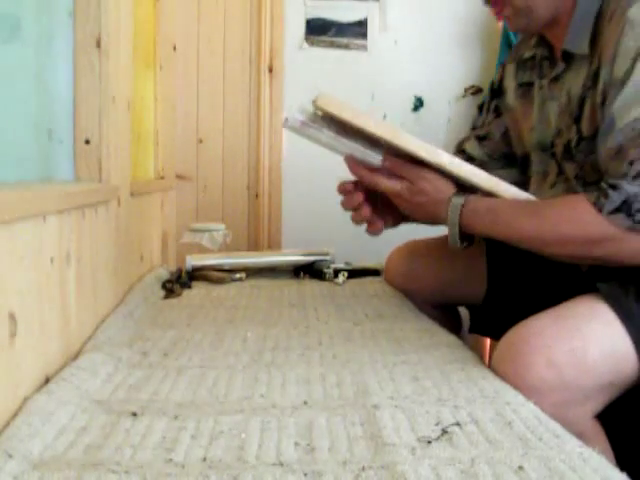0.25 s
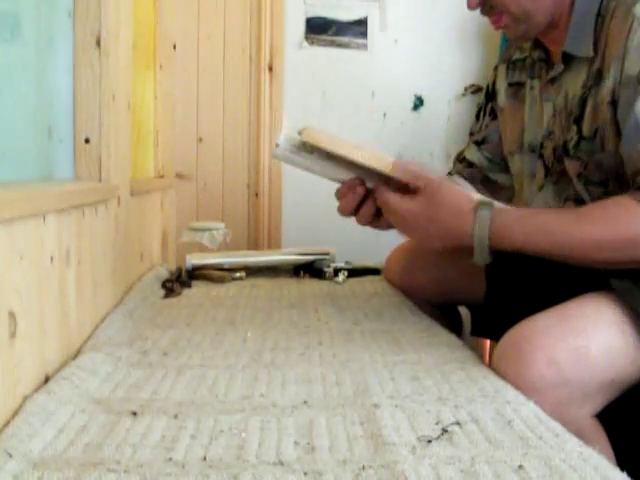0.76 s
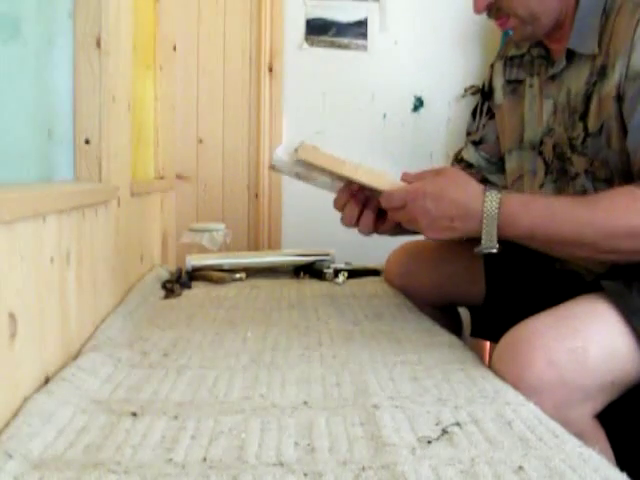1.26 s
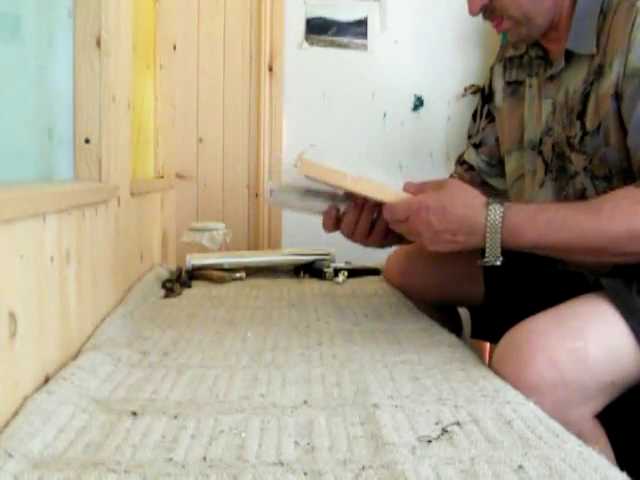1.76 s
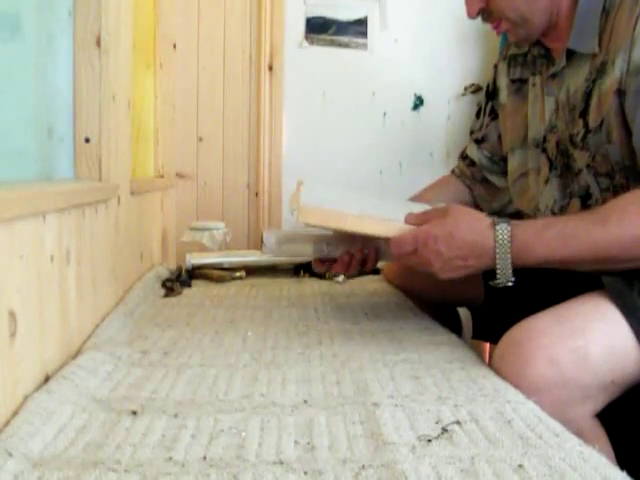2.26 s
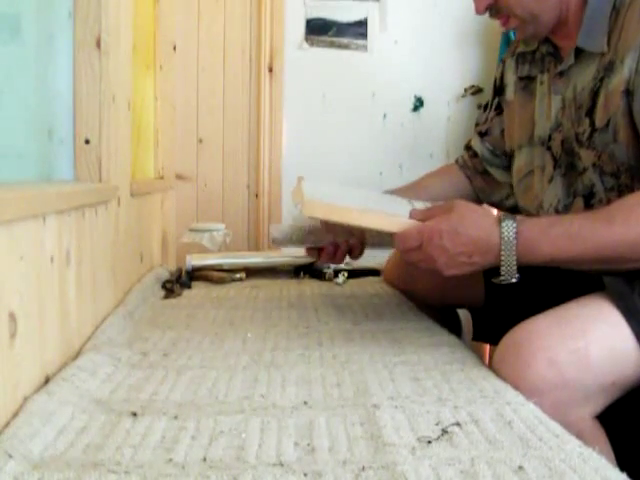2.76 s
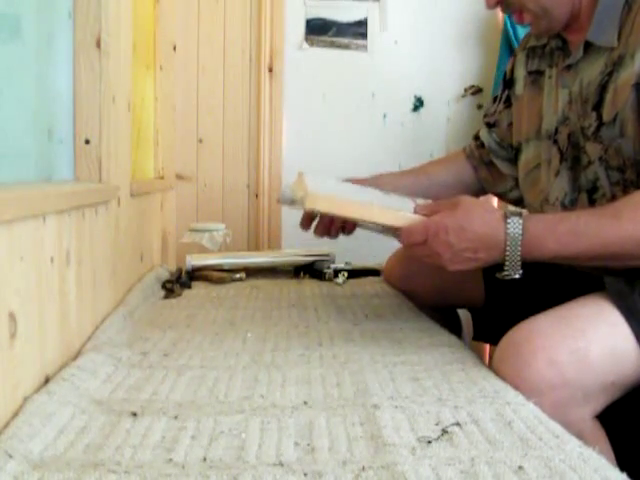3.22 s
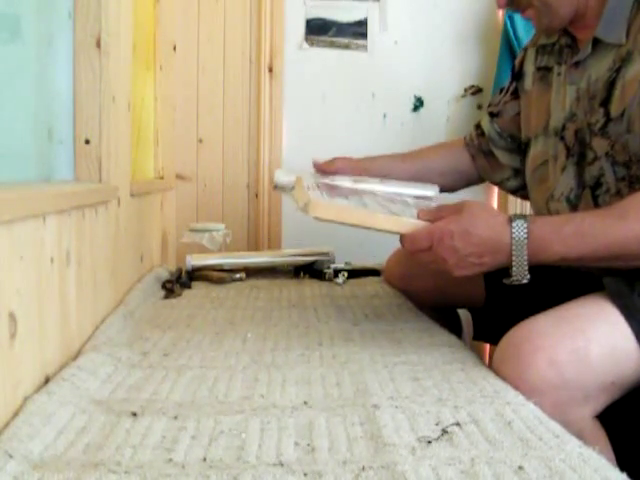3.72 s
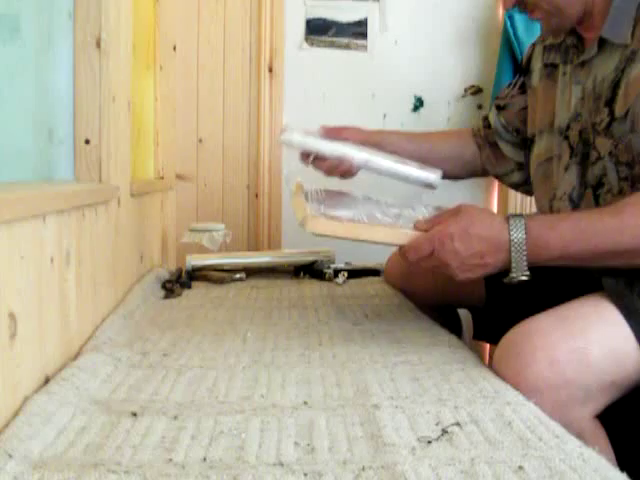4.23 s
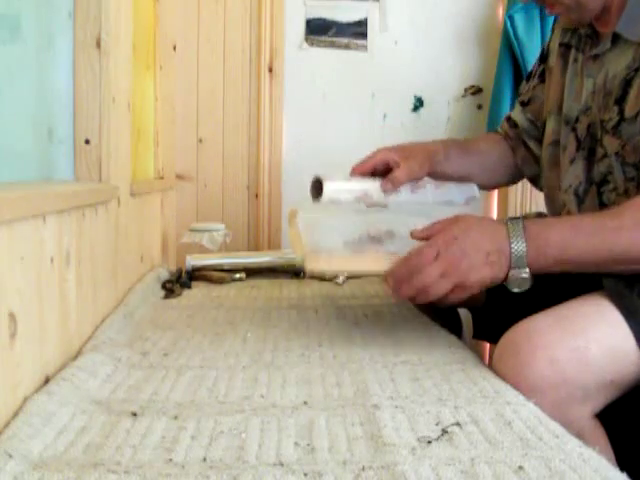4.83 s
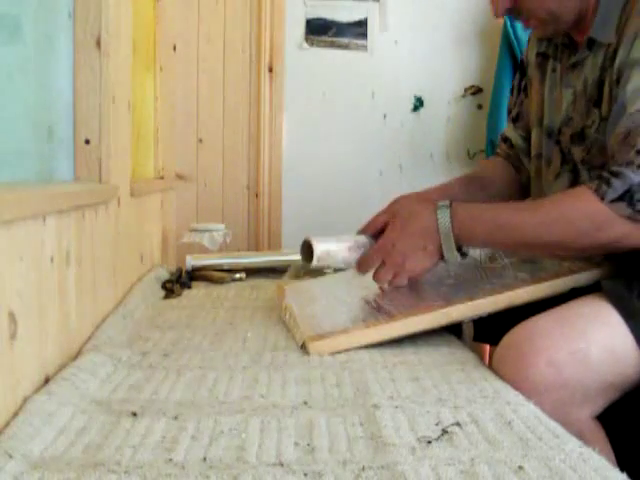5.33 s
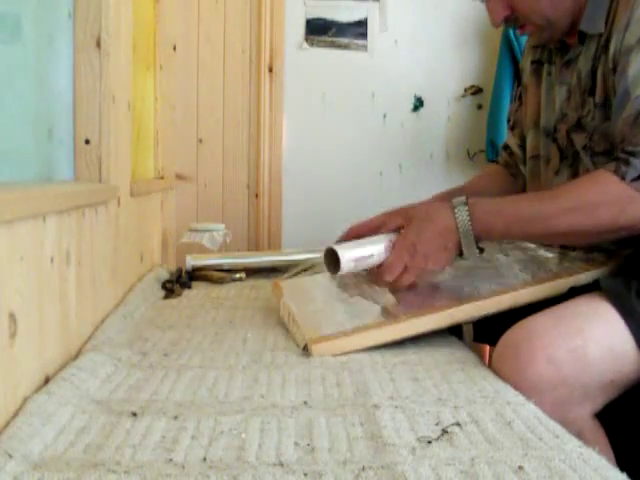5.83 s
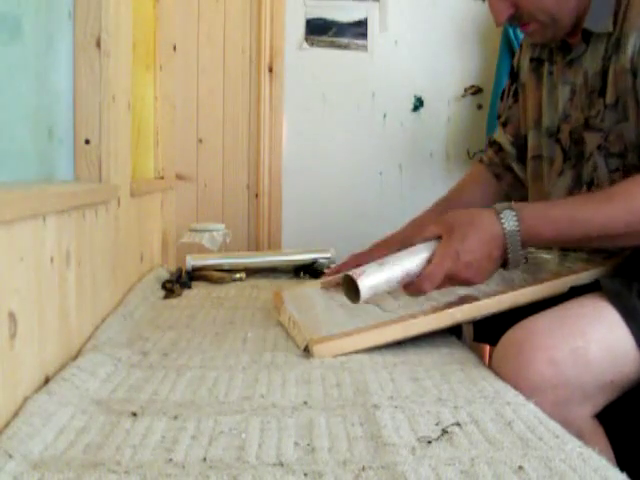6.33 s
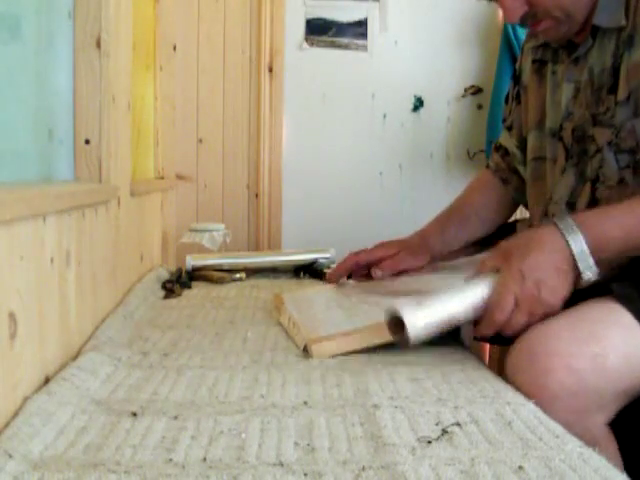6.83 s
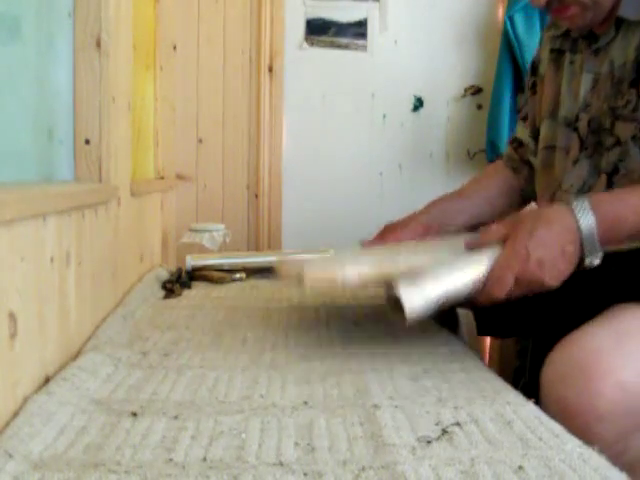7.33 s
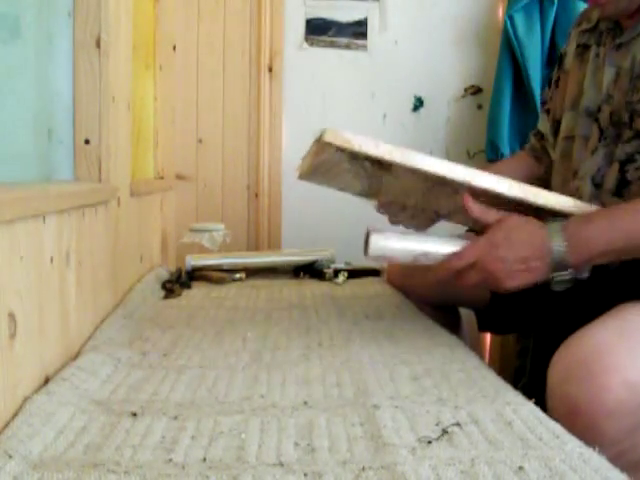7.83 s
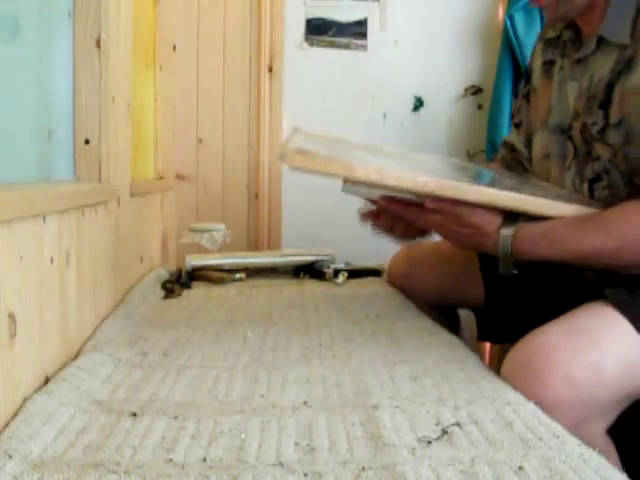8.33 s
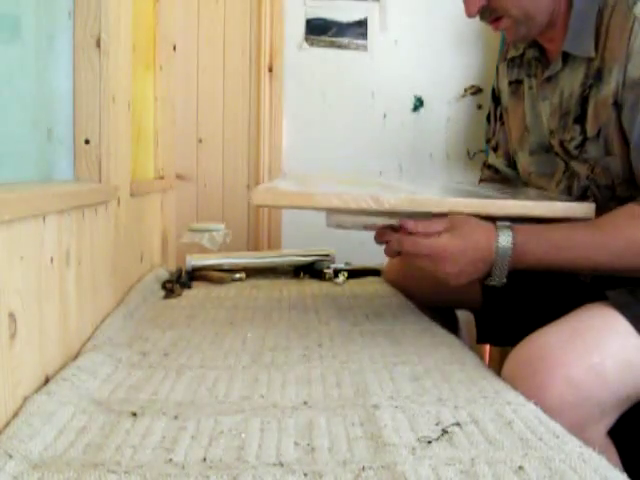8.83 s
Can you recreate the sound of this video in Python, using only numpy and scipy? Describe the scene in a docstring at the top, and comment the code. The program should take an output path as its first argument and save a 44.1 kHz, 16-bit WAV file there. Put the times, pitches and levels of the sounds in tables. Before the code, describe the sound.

A small wood-lined room with short, sparse echoes, faint low room tone and light hiss; the microphone is close and the loudest snaps clip slightly. From 0 to 1.7 s foil crinkles briskly, with sharp single snaps, dull wooden knocks near 0.65 and 1.25 s, and a strong snap at 1.63. From 1.8 to 3.6 s it is sparse: thin ticks, faint rustle, low handling bumps near 2.5 and 3.0. Rustle swells at 3.9 with a tiny high squeak at 4.0; dense bright crackles run 4.5 to 4.9. At 5.0 the board is set down with the heaviest low, soft thud and a crisp snap. Pressing and folding crackle in short bursts to 6.6, a short squeak at 6.76 leads into a loud crunch at 6.8. Snaps strike at 7.4 and 7.7, a dull knock at 8.15, and rustling with a woody rub around 8.7 fades towards 9 s.

```python
"""In a small wood-lined room, hands wrap aluminium foil round a wooden board near a microphone.
Creases snap singly as impulses and crackle in swarms of resonant clicks; fingers squeak as fuzzy tones.
Pats and set-downs ring the board's modes and push low swelling tones; rubbing, floor shake and hiss lie below.
Sparse echoes follow, a microphone port lifts 6 kHz between two notches, and the loudest snaps overload."""
import sys
import numpy as np
from scipy import signal
from scipy.fft import rfft, irfft
from scipy.io import wavfile
from scipy.ndimage import uniform_filter1d

SR = 44100
rng = np.random.default_rng(int(sys.argv[2]) if len(sys.argv) > 2 else 0)


def wav_record(signal):
    """Record a signal, one row per channel, as 16-bit PCM in the file named by sys.argv[1]."""
    frames = np.transpose(np.atleast_2d(signal))
    bounded = np.clip(frames, -1, 1)
    # unit amplitude maps onto the largest positive 16-bit level
    quanta = np.round(bounded * 32767).astype(np.int16)
    wavfile.write(sys.argv[1], SR, quanta)


N = 399987


def gain_of(db):
    """Decibel law: level to amplitude ratio; a doubled level gives the power ratio."""
    return 10 ** (np.asarray(db) / 20)


def evened(x):
    """Normalisation: the signal is scaled to an rms of 1."""
    return x / np.sqrt(np.mean(x ** 2) + 1e-20)


def read(points, hz):
    """Logarithmic frequency scale: a curve of (f, value) is interpolated along log f."""
    f, value = np.transpose(points)
    return np.interp(np.log(hz + 1), np.log(f + 1), value)


def follow(rows):
    """Slow modulation: each column after t is interpolated sample by sample."""
    s, *columns = np.transpose(rows)
    return [np.interp(np.arange(N) / SR, s, c) for c in columns]


def band(x, lo_hz, hi_hz):
    """Band limitation by a third-order Butterworth band-pass."""
    sos = signal.butter(3, [lo_hz, hi_hz], "bandpass", fs=SR, output="sos")
    return signal.sosfilt(sos, x)


def wander(corner_hz):
    """Random modulation: white noise through a one-pole low-pass, at rms 1."""
    pole = np.exp(-2 * np.pi * corner_hz / SR)
    return evened(signal.lfilter([1], [1, -pole], rng.standard_normal(N)))


def swell(s, hold_s, rise_s, fall_db_per_s):
    """Power envelope: amplitude rises linearly, holds, then decays exponentially."""
    t = np.arange(N) / SR - s
    rise = np.clip(t / rise_s, 0, 1) ** 2
    falling_s = np.clip(t - rise_s - hold_s, 0, 1)
    return rise * gain_of(-2 * fall_db_per_s * falling_s)


# spectrum of the room tone: (f/Hz, relative level/dB per Hz)
ROOM_TONE = [(15, -42), (25, -22), (130, 5), (210, -2), (292, 9.5), (554, -5), (909, -0.5), (1150, -11),
             (1290, -7), (2000, -11), (2600, -15), (4400, -120)]
ROOM_TONE_DB, HISS_DB = -53.5, -55


def air():
    """Stationary noise: shaped room tone and the band-limited hiss of the input."""
    hz = np.fft.rfftfreq(N, 1 / SR)
    spectrum = rfft(rng.standard_normal(N)) * gain_of(read(ROOM_TONE, hz))
    tone = evened(irfft(spectrum, N))
    hiss = band(rng.standard_normal(N), 1700, 22000)
    return gain_of(ROOM_TONE_DB) * tone + gain_of(HISS_DB) * hiss


# jolts of the floor: (t/s of the peak, relative peak level/dB)
FLOOR_JOLTS = [(0.01, -49), (0.66, -59), (1.26, -61), (2.53, -47), (2.63, -53), (3.74, -60), (4.97, -41),
               (5.15, -37.5), (5.86, -63), (6.82, -48), (6.97, -56), (7.17, -53), (7.85, -53), (8.39, -53)]
JOLT_RISE_S, JOLT_FALL_DB_PER_S, STILL_DB = 0.042, 88, -68


def shake():
    """Structure-borne vibration: low noise from the floor under the microphone swells at each jolt."""
    power = gain_of(2 * STILL_DB)
    for s, db in FLOOR_JOLTS:
        jolt = swell(s - JOLT_RISE_S, 0, JOLT_RISE_S, JOLT_FALL_DB_PER_S)
        power = power + gain_of(2 * db) * jolt
    return evened(band(rng.standard_normal(N), 21, 84)) * np.sqrt(power)


def ring(modes):
    """Modal superposition: an impulse response is a sum of exponentially decaying sines."""
    t = np.arange(SR // 3) / SR
    return sum(gain_of(db - 60 * t / t60) * np.sin(2 * np.pi * hz * t) for hz, db, t60 in modes)


# bending modes of the board: (f/Hz, relative level/dB, 60 dB decay time/s)
BOARD_MODES = [(259, -30, 0.14), (299, -3, 0.084), (376.7, 1, 0.06), (458.6, 1.5, 0.061),
               (521, -1.5, 0.067), (596, 4, 0.026), (730, -2.5, 0.032), (989, -15, 0.1), (1288, 1, 0.036),
               (1448, -0.5, 0.049), (1563, -4, 0.051)]
# moving hands: (t/s, foil rustle level/dB, board level/dB, low push level/dB), all relative
HAND_MOTION = [(0.0, -30, -40.5, -55), (0.56, -42.5, -38, -50), (0.78, -29, -49, -49),
               (0.85, -43, -52, -58), (1.0, -30.5, -39.5, -52), (1.49, -35.5, -42.5, -53),
               (1.77, -40.5, -62, -66), (1.88, -42.5, -63, -69), (2.32, -42.5, -71, -67),
               (2.73, -41.5, -54, -47), (3.38, -46.5, -46, -61), (3.89, -27.5, -35, -55),
               (3.95, -41, -43, -57), (4.1, -31, -51, -54), (4.16, -48.5, -60, -60), (4.29, -31, -54, -56),
               (4.5, -38, -45, -60), (4.7, -37.5, -39.5, -63), (4.97, -24, -38.5, -44),
               (6.06, -40, -46, -56), (6.27, -37.5, -42.5, -47.5), (7.8, -32, -41.5, -47),
               (8.1, -31, -45, -55), (8.28, -40, -55, -57), (8.69, -24, -35, -58), (9.07, -44.5, -53, -60)]


def handling():
    """Forced vibration: uneven rubbing noise excites the board, over a dull low push."""
    _, board_db, push_db = follow(HAND_MOTION)
    rub, push = rng.standard_normal((2, N)) * gain_of(1.6 * wander(25))
    ringing = signal.oaconvolve(rub, ring(BOARD_MODES[:7]))[:N]
    board = evened(ringing + 20 * band(rub, 170, 830))
    low = evened(band(push, 70, 158))
    return gain_of(board_db - 12) * board + gain_of(push_db - 5.5) * low


# palm and sheet push air: (t/s, relative level/dB, nominal f/Hz, time scale/cycles)
AIR_PUSHES = [(0.056, -22, 134, 3.5), (0.242, -32, 155, 3.7), (0.649, -17, 139, 7.4),
              (0.762, -24, 142, 3.3), (0.915, -26, 150, 3.7), (1.063, -33.5, 134, 4.7),
              (1.261, -16, 149, 4.5), (1.369, -32, 137, 3.7), (1.428, -25, 133, 4.3),
              (1.555, -26.5, 138, 4.3), (2.533, -23, 163, 3), (2.607, -23.5, 157, 4.8),
              (2.685, -21, 155, 3.7), (2.965, -20, 165, 3.4), (3.679, -36, 156, 3.4),
              (3.744, -26, 125, 2.3), (3.789, -36, 157, 4), (4.356, -33, 151, 7.4), (4.601, -33, 152, 4),
              (4.977, -5, 133, 5.2), (5.009, -9.5, 109, 3.4), (5.074, -32, 86.1, 3.8),
              (5.115, -21.5, 147, 4.2), (5.813, -28.5, 133, 5.3), (6.092, -38, 99, 4.6),
              (6.362, -33, 136, 5.3), (6.409, -26, 117, 8.2), (6.498, -31, 130, 3.2),
              (6.806, -19, 131, 5.6), (6.998, -37, 119, 5.4), (7.203, -27, 115, 4.3),
              (7.236, -26.5, 143, 7.4), (7.37, -28, 137, 6.9), (7.423, -27, 105, 7), (7.708, -25, 153, 9.3),
              (7.733, -20, 144, 12.4), (7.836, -24.5, 139, 7.6), (8.451, -30.5, 145, 4.9)]


def thumps(sag=0.15):
    """Displacement of air: a low tone swells and dies within cycles while its pitch sags."""
    out, t = np.zeros(N + SR), np.arange(SR // 4) / SR
    for s, db, hz, cycles in AIR_PUSHES:
        u = t * hz / cycles
        pitch_hz = hz * (1 + sag * (.4 - np.minimum(u, 2)))
        turns = np.cumsum(pitch_hz) / SR
        envelope = (3 * u * np.exp(1 - 3 * u)) ** 2
        out[round(s * SR):][:len(u)] += gain_of(db - 6) * envelope * np.sin(2 * np.pi * turns)
    return out[:N]


# hands and floor strike the board; middle and upper modes are given relative to the blow:
# (t/s, relative level/dB, middle modes level/dB, upper modes level/dB)
BLOWS = [(0.076, -16, -16, -28), (0.358, -27, -20, -10), (0.647, -7.5, -8, -10.5), (0.748, -23.5, -7, -8),
         (0.926, -28.5, -14, -16), (1.255, -9, -3.5, -4), (1.326, -37, -13, -22), (1.427, -21, -29, -25),
         (1.553, -20.5, -5.5, -18), (2.529, -29.5, -7.5, -7), (2.609, -33.5, -12, -16),
         (2.683, -33.5, -3.5, -8), (2.963, -23.5, -14.5, -10), (3.657, -35.5, 3.5, -1), (3.759, -29, 1, -4),
         (3.993, -39.5, 3.5, 8.5), (4.347, -46, 17, -5), (4.719, -44.5, 13.5, -3), (4.957, -20, -15, -12),
         (5.03, -31.5, 0, 1), (5.245, -44.5, 6.5, 13), (5.475, -22, -9, -22), (5.712, -45, 8.5, 12.5),
         (6.026, -42.5, 9.5, 20), (6.357, -33, -3.5, -2), (6.67, -31, -22, -20), (6.804, -22, -5.5, -12.5),
         (6.969, -47.5, 6.5, 16.5), (7.232, -31.5, -0.5, -4), (7.42, -29.5, 6, 8), (7.713, -20, -6, -19),
         (8.159, -15.5, -21, -20), (8.451, -33, 0, -11), (8.616, -40.5, 6.5, -13), (8.883, -22.5, 4.5, 7.5)]
FINGERS_MS = 8  # the fingers of one blow land within this time


def knocks():
    """Impulse excitation: fingers land in turn and ring the modes, with a set spectral reach per blow."""
    out = np.zeros(N + SR)
    chance = rng.random((len(BLOWS), 4))
    for (s, db, middle_db, upper_db), fingers in zip(BLOWS, chance):
        push = np.zeros(2048)
        push[(fingers * FINGERS_MS * SR / 1000).astype(int)] = 0.71
        push[0] = 1
        reach = [(360, 0), (470, middle_db), (800, middle_db), (1250, upper_db)]  # (f/Hz, level/dB)
        modes = [(hz, mode_db + read(reach, hz), t60) for hz, mode_db, t60 in BOARD_MODES]
        sound = signal.fftconvolve(ring(modes), push) / np.linalg.norm(push)
        out[round(s * SR):][:len(sound)] += gain_of(db - 7) * sound
    return out[:N]


# fingers slip on smooth foil, one list a squeak, overtone relative to the tone:
# (t/s, f/Hz, relative level/dB, overtone level/dB before a fixed lift)
FINGER_SQUEAKS = [
    [(4.014, 8220, -26, -40), (4.02, 8030, -19, -40), (4.024, 9500, -26, -40), (4.034, 9900, -15, -40),
     (4.045, 9560, -30, -40), (4.06, 9600, -34, -40)],
    [(6.752, 5070, -35, -5), (6.758, 5090, -21, -7), (6.764, 5290, -25, -8), (6.77, 5550, -38, -10)],
]


def squeaks():
    """Stick-slip friction: a tone and its octave, fuzzy through random frequency and amplitude."""
    out = np.zeros(N)
    for rows in FINGER_SQUEAKS:
        s, *columns = np.transpose(rows)
        t = np.arange(s[0], s[-1], 1 / SR)
        hz, db, over_db = (np.interp(t, s, c) for c in columns)
        jitter, flutter = uniform_filter1d(rng.standard_normal((2, len(t))), 30, axis=1)
        phase = 2 * np.pi * np.cumsum(hz * (1 + 0.11 * jitter)) / SR
        tone = np.sin(phase) + gain_of(over_db + 7) * np.sin(2 * phase)
        tone *= 1 + 1.8 * flutter
        fade = signal.windows.tukey(len(t), .2)
        out[round(s[0] * SR):][:len(t)] += gain_of(db + 13.5) * tone * fade
    return out


def foil(wide, middle, fine):
    """Size and pitch: wide folds sound low, small creases high."""
    return band(wide, 553, 3820) + band(middle, 4890, 7480) + band(fine, 8550, 16600)


# the sheet is bent and creases crackle; wide folds and fine creases relative to the swarm:
# (onset t/s, time to the fall/s, relative level/dB, wide folds level/dB, fine creases level/dB)
CREASE_SWARMS = [(0.007, 0.074, -26, -1.5, -7), (0.22, 0.074, -35, -5, -18), (0.33, 0.032, -32, -2, -8),
                 (0.374, 0.03, -26, -5, -8), (0.422, 0.064, -23.5, -3, -14),
                 (0.522, 0.028, -24.5, -3.5, -13), (0.64, 0.028, -23.5, -1.5, -14),
                 (1.042, 0.094, -17, -3, -7.5), (1.216, 0.057, -26, 2.5, -16),
                 (1.43, 0.097, -28.5, -5.5, -9.5), (1.525, 0.034, -34, -5, -14),
                 (1.641, 0.069, -24.5, -6, -14), (1.812, 0.027, -55, -5, -11), (1.938, 0.052, -39, -12, -7),
                 (2.04, 0.032, -31.5, -6.5, -11), (2.476, 0.082, -31, -6, -6), (2.65, 0.019, -42, 7, -18),
                 (2.96, 0.031, -32, 1, -9), (3.382, 0.03, -35.5, -4.5, -6), (3.5, 0.07, -45, -5, -9),
                 (3.73, 0.062, -23, -2.5, -11), (3.984, 0.097, -27.5, -9.5, -4.5),
                 (4.35, 0.025, -31, -1, -20), (4.42, 0.036, -42, 3, -17), (4.521, 0.074, -23.5, -7, -13),
                 (4.646, 0.042, -18, -8, -12), (4.702, 0.019, -20.5, -2.5, -10),
                 (4.764, 0.025, -19, -17, -13), (4.85, 0.029, -24, -34, -15), (5.003, 0.016, -24, -7, -15),
                 (5.096, 0.023, -42, -12, 0), (5.167, 0.045, -31, -3, -14), (5.24, 0.055, -31, -2, -7),
                 (5.423, 0.026, -15, -7, -9), (5.485, 0.098, -22, -1, -14), (5.625, 0.112, -27, -5.5, -7),
                 (5.794, 0.059, -33, -6, -7), (6.009, 0.033, -19, -6, -11), (6.121, 0.092, -25, -4, -7),
                 (6.356, 0.022, -30.5, 4.5, -9), (6.43, 0.045, -27.5, -7.5, -4.5),
                 (6.542, 0.093, -29.5, -4, -7.5), (6.71, 0.02, -21, -10, -20), (6.752, 0.03, -16, -26, -17),
                 (6.806, 0.092, -13.5, -5, -10.5), (7.175, 0.19, -28, -3, -8.5),
                 (7.402, 0.016, -12, -1, -16), (7.57, 0.055, -32, -20, -3),
                 (7.708, 0.046, -15.5, -0.5, -17), (8.112, 0.029, -22.5, -7, -6),
                 (8.162, 0.022, -31, -16, -19), (8.322, 0.056, -34, -23, -7),
                 (8.435, 0.041, -24.5, -5.5, -9), (8.546, 0.024, -29, -1.5, -10),
                 (8.616, 0.038, -19.5, -3.5, -21.5), (8.819, 0.071, -27.5, -5, -9.5)]
SWARM_RISE_S, SWARM_FALL_DB_PER_S = .012, 303
RUSTLE_WIDE_DB, RUSTLE_FINE_DB = -6, -8  # colour of the rustle between swarms


def crackle(per_s=600, spread_db=1.5, clump_db=2.5, patch_db=1.0, rustle=0.72, sharp=2.57):
    """Random impulses through resonators: clumped clicks ring at many pitches over a noisy rustle."""
    rustle_db = follow(HAND_MOTION)[0]
    power = gain_of(2 * (rustle_db + np.array([[RUSTLE_WIDE_DB], [0], [RUSTLE_FINE_DB]])))
    for s, hold_s, db, wide_db, fine_db in CREASE_SWARMS:
        envelope = swell(s, hold_s - SWARM_RISE_S, SWARM_RISE_S, SWARM_FALL_DB_PER_S)
        power += gain_of(2 * (db + np.array([[wide_db], [0], [fine_db]]))) * envelope
    swarm = np.zeros(N)
    for hz in np.geomspace(800, 15000, num=14):
        clicks = rng.choice([-1, 1], N) * (rng.random(N) < per_s / SR)
        clicks = clicks * gain_of(spread_db * np.minimum(rng.exponential(1, N), 5))
        source = evened(clicks) + rustle * rng.standard_normal(N)
        source = source * gain_of(patch_db * wander(6.2))
        swarm += signal.lfilter(*signal.iirpeak(hz, sharp, SR), source)
    swarm = evened(swarm * gain_of(clump_db * wander(21)))
    return foil(*(swarm * np.sqrt(power) * gain_of([[11], [6], [17]])))


# single creases buckle; wide fold and fine creases relative to the snap, before fixed lifts:
# (t/s, relative level/dB, wide fold level/dB, fine creases level/dB)
CREASE_SNAPS = [(0.033, -10.5, -11, -8), (0.0397, -9.5, 0, -8), (0.13, -11.5, -2, -8),
                (0.215, -11.5, -5, -9), (0.227, -5, -3, -28), (0.234, -1.5, 0, -11), (0.241, -15, -12, -14),
                (0.245, -10, -5, -14), (0.253, -5.5, -23, -23), (0.271, -11, 3.5, -11),
                (0.348, -5.5, 0, -6), (0.392, -5.5, -9.5, -9.5), (0.4574, -5.5, -11, -7),
                (0.5326, -6, -8.5, -16), (0.603, -12.5, -5, -6), (0.645, -4.5, 5, -11),
                (0.646, -2.5, -24, -17), (0.7696, -11.5, -11.5, -5), (1.0363, -2.5, -20, -11),
                (1.2195, 0.5, -7, -8.5), (1.241, -9.5, 3.5, -15), (1.253, -0.5, -9, -15.5),
                (1.355, -7, -7.5, -12), (1.379, -14, 0, -12), (1.4491, -6, -14, -18),
                (1.5567, -2.5, -14, -17), (1.589, -11.5, -16, -17), (1.6338, 6.5, -9.5, -13.5),
                (1.6364, 0, -12, -17), (1.6531, -4, 1, -17), (1.833, -13, -10.5, -18),
                (2.338, -16, -12, -14), (2.478, -16, -11, -10), (2.661, -5, -16, -22), (2.839, -21, -11, 1),
                (2.9403, -23, -11, 3.5), (2.9794, -4.5, -22, -10), (3.3922, -18.5, -4, -8),
                (3.5571, -20.5, -10, -11), (3.6888, -14.5, -8.5, -16), (3.7453, -4.5, -12.5, -11),
                (4.0018, -18, 0, -6), (4.331, -11, -28, -18), (4.3525, -3.5, -1, -10.5),
                (4.4268, -11.5, -20, -15), (4.4866, -18, -9, -17), (4.5304, 1.5, -17, -16),
                (4.5375, 1, -21, -20), (4.5507, 4, -12, -10.5), (4.7179, -4.5, -4.5, -13),
                (4.7603, -0.5, -15, -13), (4.768, 1, -12, -8.5), (4.824, -12, -12, -16),
                (4.842, -9, -21, -18), (4.858, -14, -24, -11), (4.87, 0.5, -29, -19), (4.943, -9, -15, -9),
                (5.0324, 5, -7.5, -15), (5.108, -13, -12, -10), (5.1115, -11.5, -12, -1),
                (5.1687, -6, -22, -14), (5.251, -1, -16, -11), (5.4282, -13, -5.5, -22),
                (5.432, -12, 2, -10), (5.5487, -4.5, -18, -16), (5.6438, -13, -3.5, -25),
                (5.808, -16.5, -8, -4.5), (6.029, 3.5, -15, -13.5), (6.127, -18, -8, -15),
                (6.283, -8.5, -18, -13), (6.348, -13, -18, -12), (6.3655, 0.5, -23, -17),
                (6.3697, -15, -13, -3), (6.448, -22, -15, -15), (6.5442, -19, -15, -3),
                (6.715, 4.5, -21, -22), (6.7207, -7, -23, -19), (6.756, -14, -18, -14),
                (6.765, 5, -38, -31), (6.771, 2.5, -36, -31), (6.973, -23, 6, -15), (7.194, -12, -15, -7),
                (7.2393, -9, -13, -7.5), (7.34, -8, -10, -12), (7.422, 4.5, -5, -12),
                (7.5916, -18, -2, 6.5), (7.699, -4.5, -7, -15), (7.704, -8, 2.5, -14),
                (7.8033, -4, -9, -11), (7.8548, -18, 0, -17), (8.143, 1.5, -5.5, -15),
                (8.1821, -2.5, -1.5, -19), (8.1862, 2.5, -13.5, -16), (8.4476, -10, -14, -16),
                (8.5498, -3, -10.5, -13.5), (8.6342, -2.5, -12.5, -8.5), (8.8845, -9.5, 8, -20)]
FOLD_HZ, FOLD_SPREAD = 3180, 0.18  # central fold pitch, and its spread in log frequency


def snaps(t60=0.014, breadth=0.79, followers=0.12):
    """Buckling instability: one impulse, then a few neighbours within milliseconds; the fold resonates."""
    fade = gain_of(-60 * np.arange(1024) / SR / t60)
    parts = np.zeros((3, N + 1024))
    chance = rng.standard_normal((len(CREASE_SNAPS), 1024))
    for (s, db, wide_db, fine_db), slips in zip(CREASE_SNAPS, chance):
        burst = followers * fade * slips * abs(slips)  # a few slips stand out
        burst[0] = 1
        fold_hz = FOLD_HZ * np.exp(FOLD_SPREAD * slips[0])
        fold = signal.lfilter(*signal.iirpeak(fold_hz, 1 / breadth, SR), burst)
        sound = [gain_of(wide_db + 10.5) * fold, burst, gain_of(fine_db + 12.5) * burst]
        parts[:, round(s * SR):][:, :1024] += gain_of(db + 14.0) * np.array(sound)
    return foil(*parts[:, :N])


# reverberation of the room: (f/Hz, 60 dB decay time/s)
WALL_DECAY = [(200, 0.26), (530, 0.22), (1400, 0.17), (3700, 0.099), (9700, 0.13)]


def walls(x):
    """Reverberation: sparse echoes decay band by band; three sets fade into one another in steady rotation."""
    taps = np.zeros((3, SR // 2))
    slots = np.arange(160, SR // 2 - 20, 20)
    at = slots + rng.integers(0, 20, (3, len(slots)))  # one echo in every 20 samples
    np.put_along_axis(taps, at, rng.choice([-1., 1.], at.shape), 1)
    hz, t, z = signal.stft(taps, SR, nperseg=128)
    decay = gain_of(-60 * t / read(WALL_DECAY, hz)[:, None])
    tails = signal.istft(z * decay, SR, nperseg=128)[1]
    phase = np.pi * (3 * np.arange(N) / SR + np.arange(3)[:, None] / 3)
    turns = np.cos(phase) * np.sqrt(2 / 3)  # the three squares sum to 1
    echoes = signal.oaconvolve(x * turns, tails / np.linalg.norm(tails[0]), axes=1)
    return echoes[:, :N].sum(0)


def scene():
    """Superposition: direct foil, board, shake and air, with the echoes of foil and knocks."""
    bright, sudden, wood = crackle() + squeaks(), snaps(), knocks()
    echoes = walls(gain_of(-8.5) * bright + gain_of(0.5) * sudden + gain_of(16) * wood)
    board = band(wood + handling(), 89, 4600) + thumps()  # a small board radiates no deep bass
    low = gain_of(16.0) * (board + shake() + air())
    return (bright + sudden + band(echoes, 120, 22000) + low)[None]


# broad response of the microphone port: (f/Hz, level/dB)
PORT_RESPONSE = [(900, -11), (2000, -11), (3800, -5), (4500, -3.5), (5400, 1), (6200, 6), (7100, -3),
                 (8500, -11), (11000, -18), (15500, -24)]
# its notches: (f/Hz, width/Hz, depth as level/dB)
PORT_NOTCHES = [(4856, 287, -16.5), (7705, 490, -19)]
EDGE_HZ = 15600  # upper band limit


def record(dry):
    """Minimum-phase filtering by the microphone port, then input clipping and a low-pass."""
    hz = abs(np.fft.fftfreq(4096, 1 / SR))
    db = read(PORT_RESPONSE, hz)
    for f, width, depth in PORT_NOTCHES:
        db = db + depth / (1 + (2 * (hz - f) / width) ** 2)
    # the Hilbert transform of the log gain supplies the phase of a causal filter
    response = np.exp(np.conj(signal.hilbert(np.log(gain_of(db)))))
    port = np.fft.ifft(response).real[:2048]
    heard = np.clip(signal.oaconvolve(dry, port[None])[:, :N], -1, 1)
    low_pass = signal.firwin(511, EDGE_HZ, window=("kaiser", 9), fs=SR)
    return signal.oaconvolve(heard, low_pass[None], "same")


dry = scene()
out = record(dry)
wav_record(out)
```